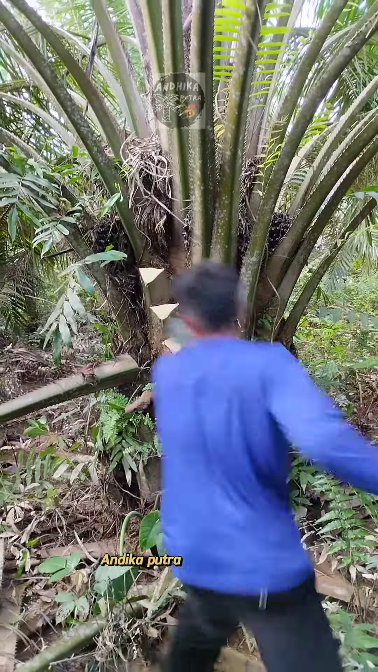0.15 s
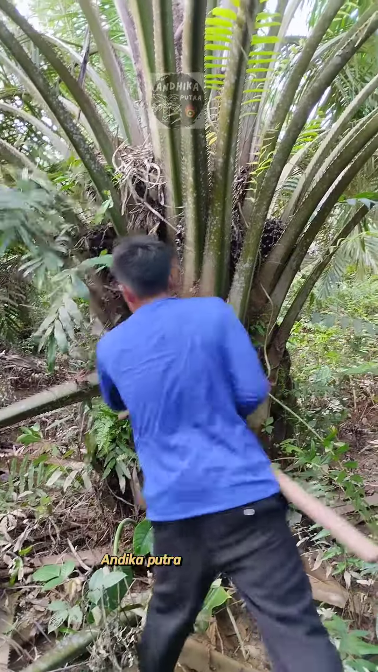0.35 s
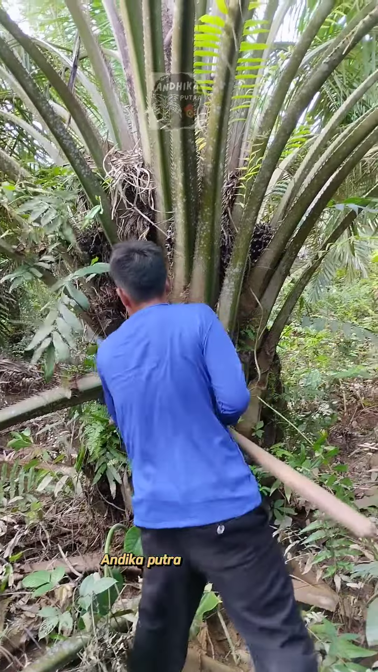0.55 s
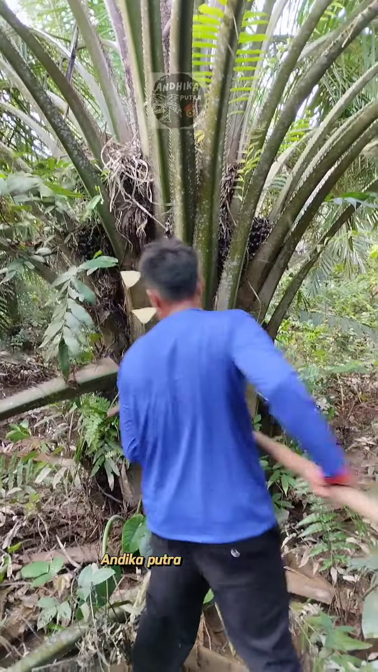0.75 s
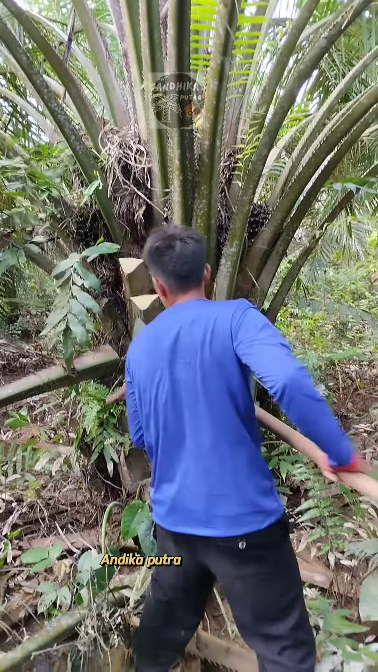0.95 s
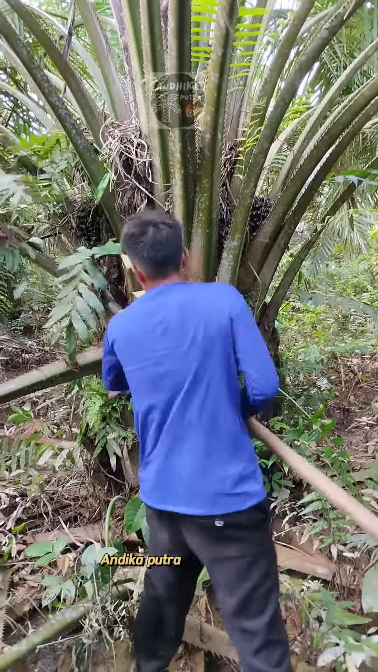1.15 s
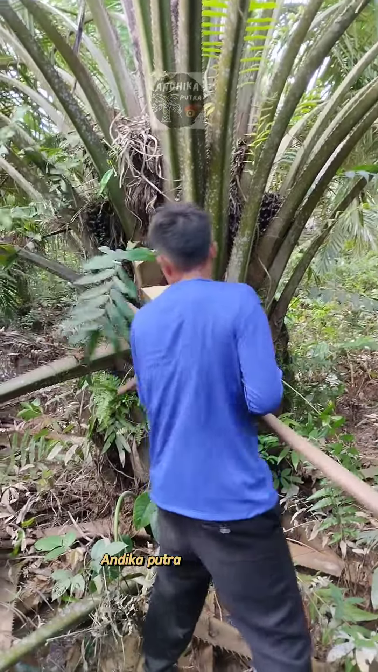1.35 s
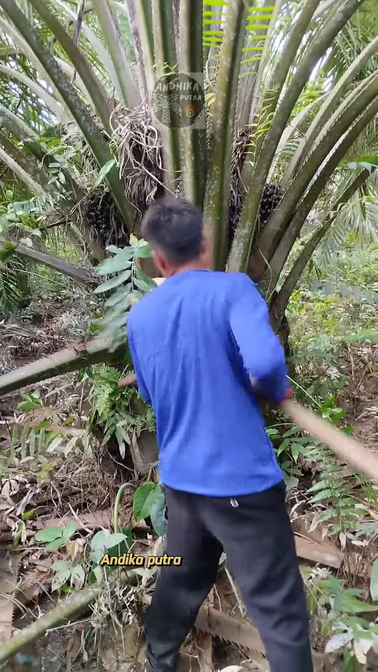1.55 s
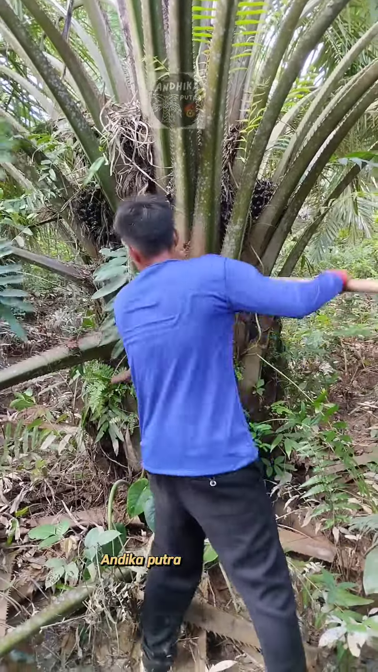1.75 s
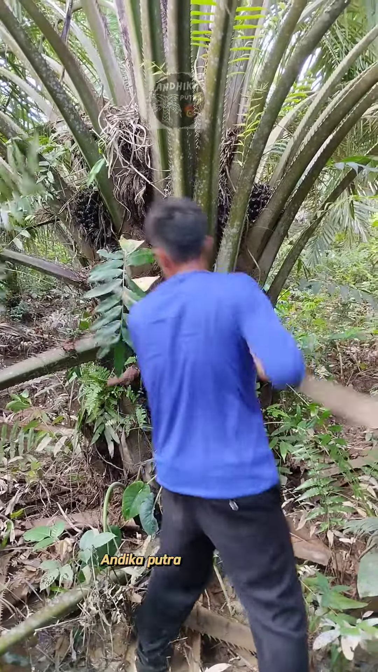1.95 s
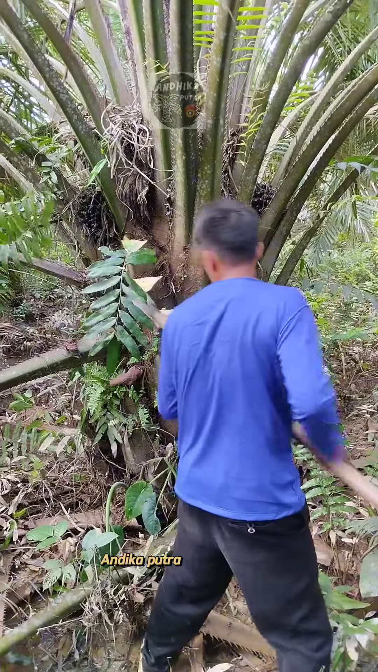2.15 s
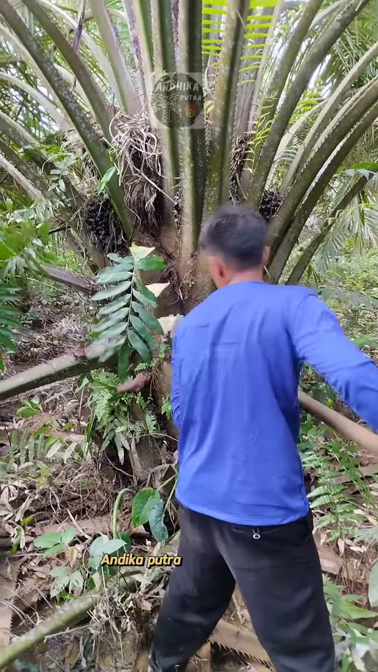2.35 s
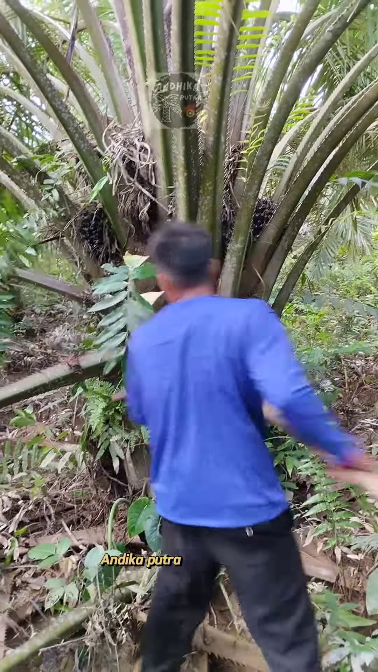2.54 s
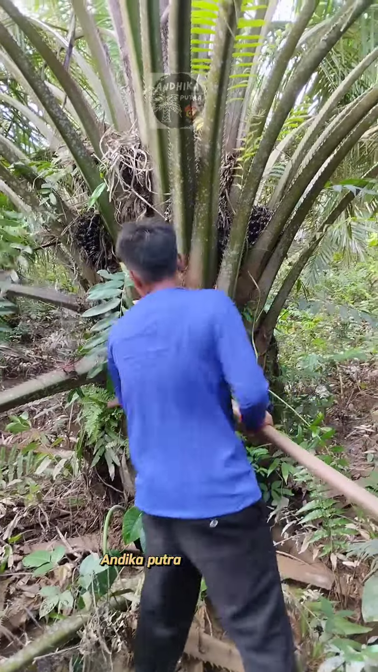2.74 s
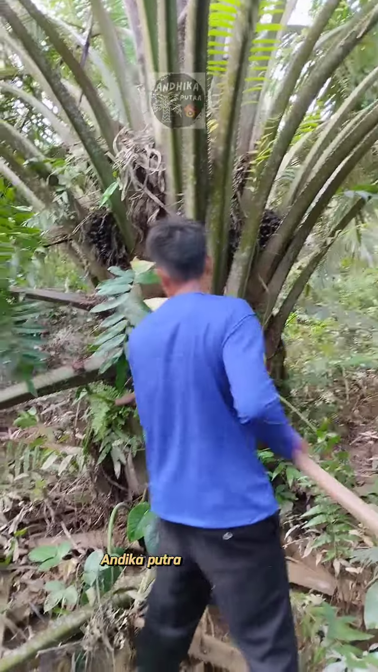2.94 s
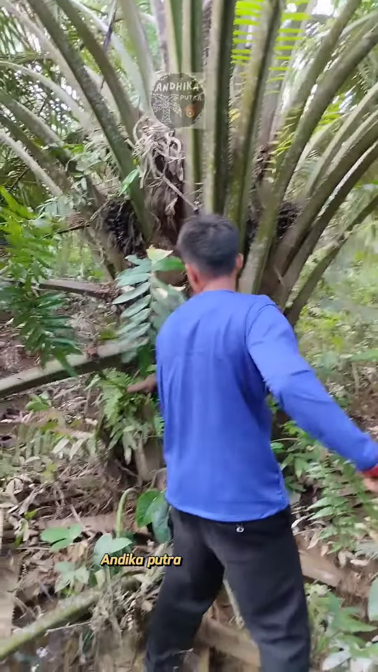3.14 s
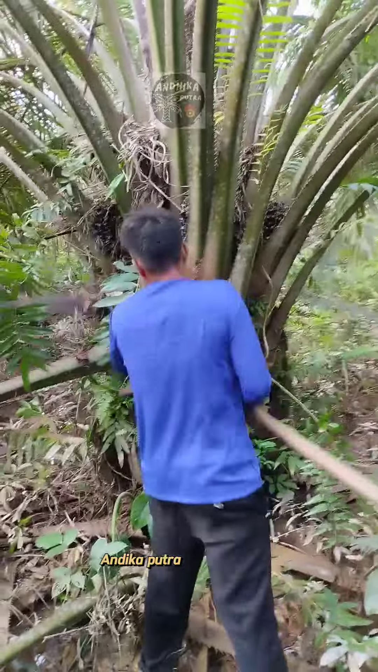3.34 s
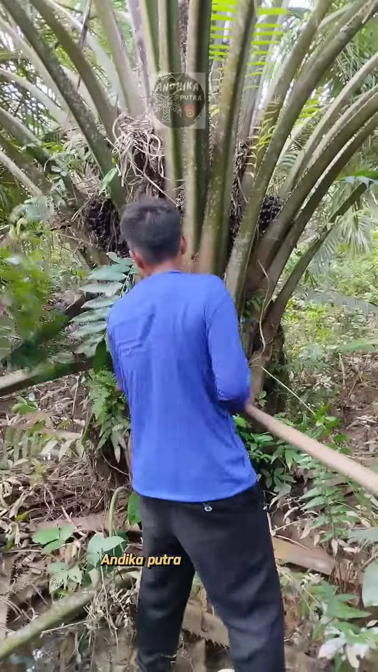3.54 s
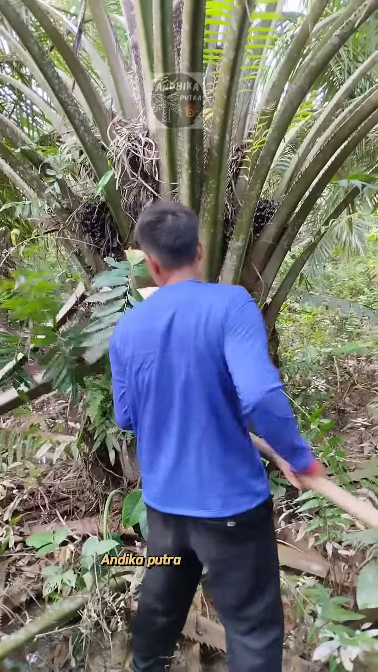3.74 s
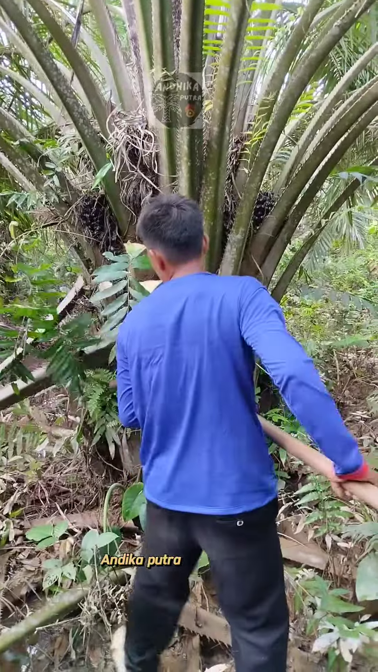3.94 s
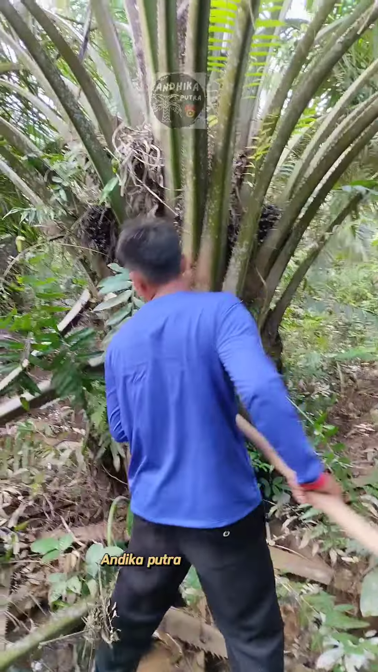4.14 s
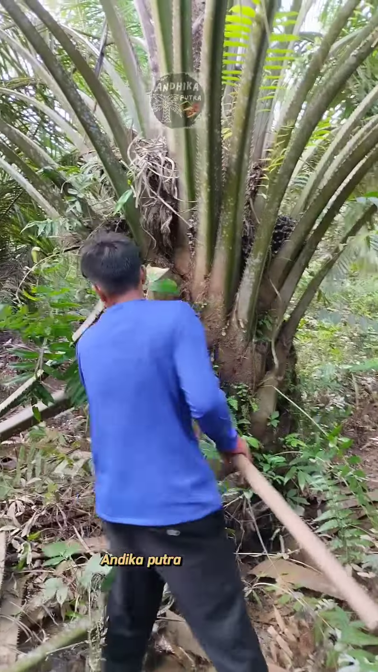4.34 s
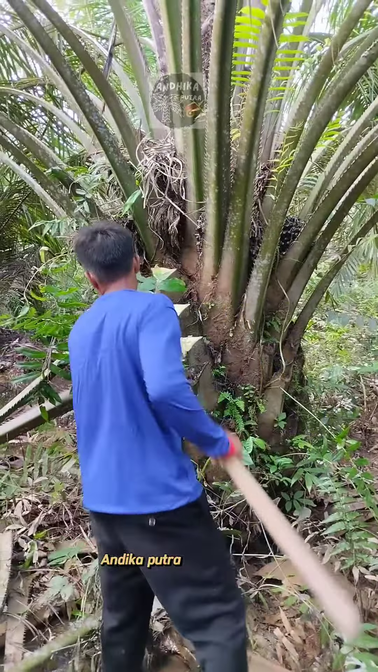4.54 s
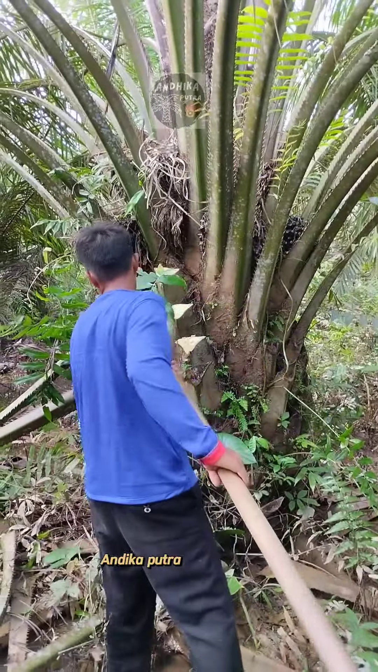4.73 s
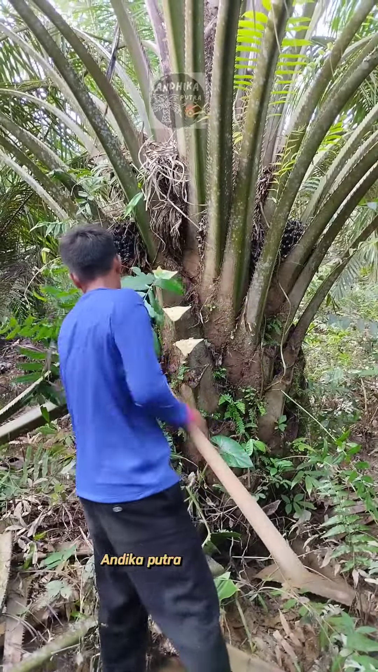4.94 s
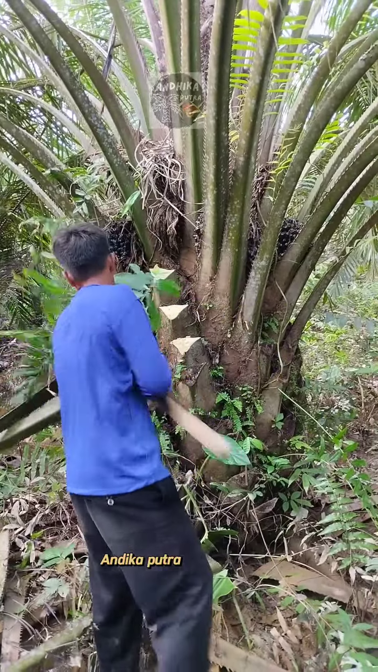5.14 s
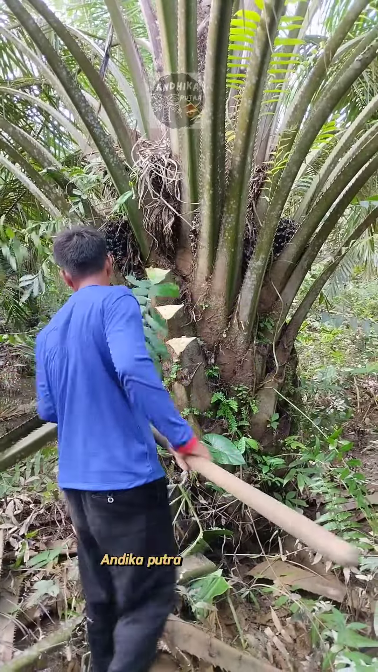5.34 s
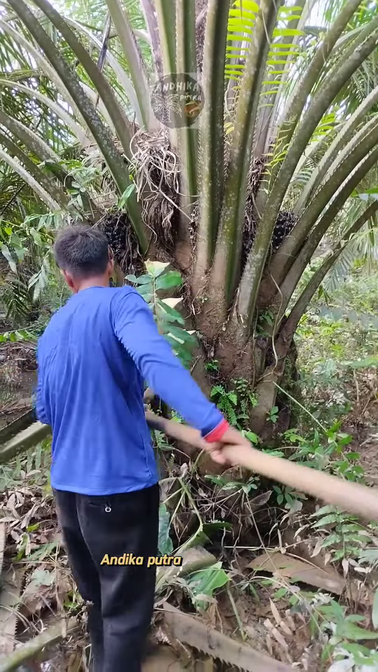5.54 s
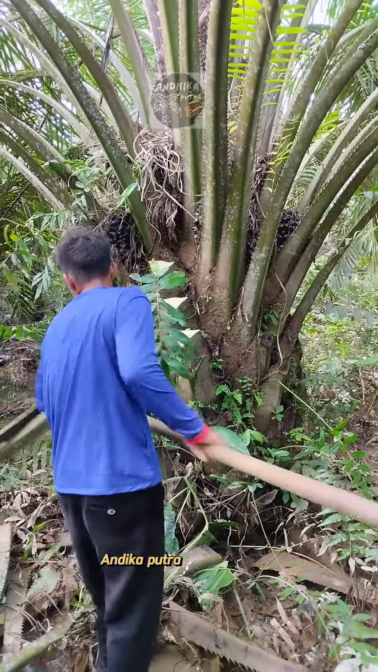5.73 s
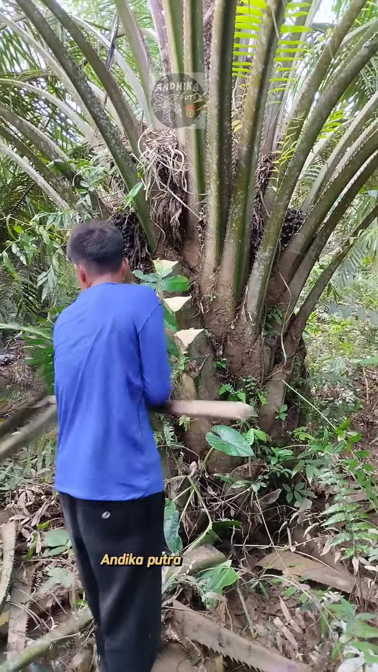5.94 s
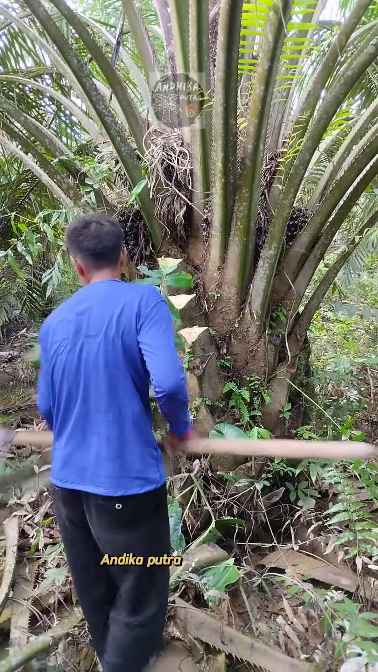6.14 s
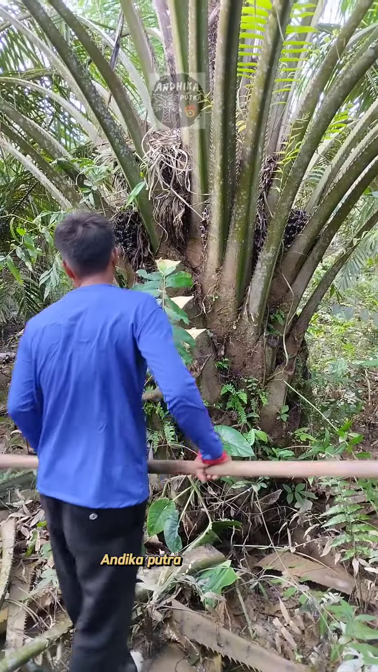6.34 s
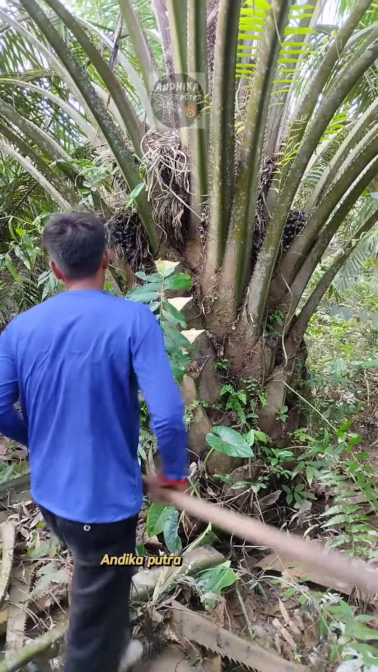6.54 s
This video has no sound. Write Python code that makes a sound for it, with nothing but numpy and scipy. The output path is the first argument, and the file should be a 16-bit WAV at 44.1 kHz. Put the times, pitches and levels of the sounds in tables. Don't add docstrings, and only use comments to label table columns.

```python
import sys
import numpy as np
from scipy import signal
from scipy.fft import rfft, irfft
from scipy.io import wavfile
from scipy.ndimage import uniform_filter1d

SR = 44100
rng = np.random.default_rng(int(sys.argv[2]) if len(sys.argv) > 2 else 0)


def master_out(mix):
    frames = np.transpose(np.atleast_2d(mix))
    ceiling = np.clip(frames, -1, 1)
    pcm = np.round(ceiling * 32767).astype(np.int16)
    wavfile.write(sys.argv[1], SR, pcm)


def field_ratio(decibels):
    return 10 ** (np.asarray(decibels, dtype=float) / 20)


N = 290235


def evened(x):
    return x / np.sqrt(np.mean(x ** 2) + 1e-20)


def smoothed_twice(x, size, axis=-1):
    return uniform_filter1d(uniform_filter1d(x, size=size, axis=axis), size=size, axis=axis)


def read(points, hz):
    f, value = np.transpose(points)
    return np.interp(np.log(hz + 1), np.log(f + 1), value)


def curves(rows):
    s, *columns = np.transpose(rows)
    return [np.interp(np.arange(N) / SR, s, c) for c in columns]


def add(mix, s, sound):
    part = mix[round(s * SR):][:len(sound)]
    part += sound[:len(part)]


def resonate(x, hz, width):
    return signal.lfilter(*signal.iirpeak(hz, hz / width, SR), x)


def resonate_twice(x, hz, width):
    return resonate(resonate(x, hz, width), hz, width)


def band(x, lo_hz, hi_hz):
    sos = signal.butter(2, [lo_hz, min(hi_hz, .45 * SR)], "bandpass", fs=SR, output="sos")
    return signal.sosfilt(sos, x)


def coloured(x, spectrum):
    gain = field_ratio(read(spectrum, np.fft.rfftfreq(len(x), 1 / SR)))
    return evened(irfft(rfft(x) * gain, len(x)))


def crackle(size, spread_db, share):
    noise, chance, strength = rng.standard_normal(size), rng.random(size), rng.exponential(1, size)
    breaks = (chance < share) * field_ratio(spread_db * np.minimum(strength, 3))
    bursts = signal.lfilter([1], [1, -.97], breaks)
    return evened(noise * (1 + bursts))


def patchy(spectrum, patch_db):
    hz = np.fft.rfftfreq(1024, 1 / SR)
    real, imag, patches = rng.standard_normal((N // 256 + 5, 513, 3)).T
    patches = evened(smoothed_twice(smoothed_each_way(patches), 1))
    level_db = read(spectrum, hz)[:, None] + patch_db * patches
    noise = signal.istft((real + 1j * imag) * field_ratio(level_db), nperseg=1024, noverlap=768)[1]
    return evened(noise[:N])


def smoothed_each_way(patches):
    return uniform_filter1d(uniform_filter1d(patches, size=12, axis=0), size=12, axis=1)


# frequency in Hz, level in dB per Hz.
AIR_SPECTRUM = [(12, -44), (20, -10.5), (117, 3), (236, -14), (381, -26), (1170, -29), (1550, -29),
                (1990, -32.5), (2640, -31), (3910, -84), (8110, -59), (9870, -70.5), (16400, -63.5)]
AIR_DB = -37
GUST_DB, GUST_SWING_DB = -47, 4.0


def air():
    still = field_ratio(AIR_DB - 3) * patchy(AIR_SPECTRUM, 0.4)
    gusts = evened(smoothed_twice(rng.standard_normal(N), 2500))
    breeze = evened(band(rng.standard_normal(N), 40, 200))
    return still + field_ratio(GUST_DB + GUST_SWING_DB * gusts) * breeze


# frequency in Hz, width in Hz, level in dB.
ENGINE_ORDERS = [(119, 14, -47), (220.6, 48, -53), (51.7, 11, -84.5)]
# frequency in Hz, width in Hz, level in dB.
INSECT_BAND = (9850, 1100, -67.5)


def engine_and_insects():
    out = np.zeros(N)
    for hz, width, db in [*ENGINE_ORDERS, INSECT_BAND]:
        out += field_ratio(db) * evened(resonate_twice(rng.standard_normal(N), hz, width))
    return out


# frequency in Hz, level in dB per Hz.
LEAF_SPECTRUM = [(180, -34.5), (300, 1), (681, 0), (890, -0.5), (1450, 0.5), (2970, -0.5), (4150, 0.5),
                 (9100, -11.5), (15000, -13), (16400, -12.5)]
# frequency in Hz, level in dB per Hz.
LITTER_SPECTRUM = [(180, -40), (300, -6.5), (567, -4), (875, -14.5), (1260, -8), (1800, -12.5),
                   (2090, -1.5), (3120, -12.5), (4430, -4), (5510, -17), (8800, -11.5), (10100, -17.5),
                   (15000, -20), (16400, -17)]
DOWN_S = 4.9
# time in seconds, level in dB.
RUSTLE_LEVELS = [(0.0, -54.5), (.2, -59), (.33, -37), (.45, -41), (.71, -41.5), (.9, -48), (1.74, -47),
                 (2.35, -59.5), (2.6, -56), (2.78, -45), (3.48, -74), (4.31, -64.5), (4.89, -68.5),
                 (5.31, -41), (5.55, -61.5), (5.8, -55.5), (6.21, -41.5), (6.58, -58.5)]
FIZZ_DB, FIZZ_LOSS_PER_DB, DRY_FIZZ_DB = -18.5, 1.03, -6


def rustle():
    level_db, = curves(RUSTLE_LEVELS)
    grains = crackle(N, 2.5, 0.0015)
    down = np.clip((np.arange(N) / SR - DOWN_S) * 10, 0, 1)
    body = (1 - down) * coloured(grains, LEAF_SPECTRUM) + down * coloured(grains, LITTER_SPECTRUM)
    body = body + field_ratio(-12 + 5 * down) * ticks(260, 1200, 9000, 4.)
    fizz_db = FIZZ_DB - FIZZ_LOSS_PER_DB * (level_db + 56.0) + DRY_FIZZ_DB * down
    fizz = evened(band(crackle(N, 2., .002), 6000, 14000))
    return field_ratio(level_db - 1) * (body + field_ratio(fizz_db) * fizz)


def ticks(per_s, lo_hz, hi_hz, spread_db):
    t, out = np.arange(300) / SR, np.zeros(N)
    for hz in np.geomspace(lo_hz, hi_hz, num=12):
        at, strength = rng.random(N) < per_s / 12 / SR, rng.exponential(1, N)
        hits = at * field_ratio(spread_db * np.minimum(strength, 3))
        tick = np.sin(2 * np.pi * hz * t) * t * hz * np.exp(-t * hz / 0.67)
        out += signal.oaconvolve(hits, tick)[:N]
    return evened(out)


# start in seconds, peak in dB, ring in Hz.
TIP_FLICKS = [(0.055, -48, 13000), (.126, -52, 12240), (0.207, -31, 4070), (1.661, -35.5, 5130),
              (1.956, -46, 14000), (2.296, -48.5, 13000), (2.369, -50, 12000), (2.55, -48, 14000),
              (2.806, -38, 13000), (2.965, -50.5, 9000), (2.83, -31.5, 9380), (3.366, -41.5, 13000),
              (4.318, -37.5, 8700), (4.335, -45, 11000), (4.535, -50, 8900), (5.155, -36.5, 8200),
              (5.929, -35, 8500), (6.024, -36.5, 8600), (6.075, -35, 8500), (6.316, -36.5, 7870),
              (6.544, -64, 8200)]
# start in seconds, peak in dB, ring in Hz, splinter hiss in dB.
LEAFLET_SNAPS = [(.0568, -39, 937, -11), (0.124, -40, 2630, -4), (.1472, -25.5, 4720, -13.5),
                 (0.478, -32, 3670, -8), (.712, -31.5, 1400, -5), (.827, -26.5, 1720, -14),
                 (0.864, -32, 1110, -14), (.866, -29, 1700, -8.5), (0.869, -30, 3450, -12),
                 (0.9447, -42, 1310, -8), (1.0558, -33, 1580, -12.5), (1.283, -14, 3100, -15),
                 (1.422, -24, 3100, -17), (1.4788, -11, 3030, -17.5), (1.5152, -18.5, 2980, -9),
                 (1.6384, -31, 2920, -35), (1.6733, -20, 2940, -11), (1.688, -37.5, 1530, 7.5),
                 (1.708, -20, 3060, -15), (1.7444, -28, 3900, -8), (1.765, -38, 5540, 1),
                 (1.921, -38, 1230, -17), (1.9576, -40, 1820, -14), (2.3027, -57, 960, 2.5),
                 (2.559, -44.5, 2640, -4), (3.018, -40, 3180, -10.5)]
# start in seconds, peak in dB, ring in Hz, splinter hiss in dB.
RIB_CREAKS = [(.129, -47, 950, -20), (0.22, -20, 1770, -11), (.226, -23, 1600, -6), (0.248, -21, 2010, -10),
              (0.24, -23.5, 1184, -22), (0.272, -17, 1876, -25), (0.23, -24, 2300, -19),
              (1.801, -22, 1100, -7), (3.368, -16.5, 2210, -30), (4.526, -28.5, 2000, -26),
              (4.968, -16, 1290, -14), (5.309, -12.5, 2080, -19.5), (5.457, -29, 2140, -17),
              (5.748, -17, 2060, -21), (6.54, -36, 2000, -4), (5.7425, -20, 1150, -8),
              (4.972, -21.5, 960, -35), (6.54, -36.5, 870, -17), (4.535, -30, 2600, -20)]
# start in seconds, peak in dB, ring in Hz.
DRY_CRACKS = [(5.032, -36, 2240), (5.0729, -17.5, 3200), (5.0788, -25, 2400), (5.1146, -23.5, 2340),
              (5.14, -24, 5250), (5.1756, -26, 2480), (5.185, -21.5, 3600), (5.231, -24, 2110),
              (5.2515, -18.5, 2380), (5.2802, -18, 4600), (5.341, -12, 2400), (5.484, -28, 3880),
              (5.0718, -32, 4700), (5.082, -22, 3040), (5.2356, -20, 2790), (5.4538, -20.5, 2650),
              (5.478, -31, 2300), (5.5466, -44, 2510), (5.635, -50, 1980), (5.653, -54, 3750),
              (5.93, -35, 4200), (6.514, -43, 2500), (5.1502, -27, 2430), (5.859, -23, 2500),
              (5.8788, -18, 2580), (5.9404, -23.5, 4440), (5.9914, -36, 4700), (6.0548, -24.5, 2660),
              (6.0765, -19, 5030), (6.1028, -16, 4530), (6.1264, -15.5, 2630), (6.144, -20, 2720),
              (6.1807, -23, 2850), (6.192, -18, 2400), (6.21, -15.5, 2550), (6.237, -15.5, 3780),
              (6.257, -16.5, 2560), (6.298, -29, 1748), (6.368, -25.5, 2720), (6.44, -36, 1760)]
TIP_T60_S, SNAP_T60_S, CREAK_T60_S, CRACK_T60_S = 0.071, 0.055, 0.049, 0.059
TIP_HISS_DB = -1.5
CRACK_HISS_DB, HISS_LOSS_PER_DB = -11, .5


def ribs():
    thin, thick, brittle = 26, 48, 17
    middling_db = -25
    out = np.zeros(N)

    def play(s, *rib):
        add(out, s, snap(LEAF_SPECTRUM if s < DOWN_S else LITTER_SPECTRUM, *rib))

    for s, db, hz, hiss_db in LEAFLET_SNAPS:
        play(s, thin, db, hz, hiss_db, SNAP_T60_S)
    for s, db, hz, hiss_db in RIB_CREAKS:
        play(s, thick, db, hz, hiss_db, CREAK_T60_S)
    for s, db, hz in TIP_FLICKS:
        play(s, thin, db, hz, TIP_HISS_DB, TIP_T60_S)
    for s, db, hz in DRY_CRACKS:
        hiss_db = CRACK_HISS_DB - HISS_LOSS_PER_DB * (db - middling_db)
        play(s, brittle, db, hz, hiss_db, CRACK_T60_S)
    return out


def snap(spectrum, cycles, db, hz, hiss_db, t60):
    t = np.arange(SR // 6) / SR
    turns = t * hz / cycles
    ring = np.sin(2 * np.pi * hz * t) * np.minimum(turns * 14, 1) * field_ratio(-60 * turns)
    grains = crackle(len(t), 1., .004)
    wide = coloured(band(grains, hz / 3, 23000), spectrum)
    crack = field_ratio(-24.5 - 60 * t / 0.0031) * wide
    splinters = wide + field_ratio(-4.5) * evened(resonate(grains, hz, hz / 4))
    fade = field_ratio(hiss_db - 2 - 60 * (t / t60) ** 1.3) * np.minimum(t / 0.003, 1)
    return field_ratio(db) * (ring + crack + fade * splinters)


# start in seconds, peak in dB, rise in seconds,
# t60 in seconds, centre in Hz.
STALK_BUMPS = [(3.906, -32, 0.0019, 0.052, 910), (.175, -38.5, 0.015, 0.94, 1830),
               (1.675, -25.5, 0.01, 0.083, 2700), (1.893, -37, 0.025, 0.078, 1300),
               (2.668, -7.5, 0.0092, 0.027, 1930), (2.825, -41, 0.0044, 0.067, 5320),
               (3.172, -46.5, 0.018, 0.085, 1210), (3.363, -25.5, 0.0033, 0.22, 1370),
               (4.311, -23, 0.0039, 0.14, 1250), (4.326, -34, 0.013, 0.064, 2380),
               (4.525, -49.5, 0.0036, 0.64, 2170), (4.964, -30.5, 0.011, 0.094, 2320)]
# start in seconds, peak in dB, rise in seconds, t60 in seconds, centre in Hz.
BLADE_CHOPS = [(.207, -33.5, 0.016, 0.33, 3850), (1.8, -24, 0.0022, 0.065, 2760),
               (3.514, -27, 0.0022, 0.042, 1310), (.282, -12, 0.0073, 0.12, 3100),
               (1.135, -9, 0.025, 0.09, 3100), (1.345, -37, .022, .1, 4000), (1.503, -38, .015, .15, 6000),
               (2.653, -15.5, 0.0048, 0.17, 2940), (2.904, -32.5, 0.0018, 0.091, 2000),
               (3.203, -36.5, 0.00089, 0.038, 1520), (3.938, -47.5, 0.0038, 0.1, 2540),
               (5.44, -31, 0.01, 0.22, 2310), (5.7405, -20, 0.0038, 0.057, 1870),
               (5.754, -30, .004, 0.049, 3770), (5.765, -32, .003, 0.083, 2460),
               (.552, -40.5, 0.011, .1, 1900), (.637, -38.5, 0.012, .08, 3550), (.69, -40, .01, .08, 2672),
               (4.235, -51.5, 0.017, .15, 2560), (5.77, -38, 0.059, 0.5, 3000),
               (6.049, -37, 0.07, 0.76, 3970), (6.171, -30.5, 0.064, 0.18, 3800)]
# start
# in seconds, peak in dB, rise in seconds, t60 in seconds, centre in Hz.
THUMPS = [
    (3.51, -39.5, 0.018, .03, 1000),
    (2.677, -32, 0.0058, 0.035, 890),
    (4.973, -41, 0.0058, 0.044, 670),
]
BUMP_STALK_DB, CHOP_STALK_DB, THUMP_STALK_DB = 3.5, -15, 24
# frequency in Hz, level in dB per Hz.
FIBRE_SPECTRUM = [(150, -52), (330, -11.5), (512, -8.5), (961, -7), (1270, -4), (1680, -8), (3390, -7.5),
                  (10000, -7.5), (14700, -22), (16400, -26)]


def blows():
    out = np.zeros(N)
    for table, stalk_db in ((BLADE_CHOPS, CHOP_STALK_DB), (STALK_BUMPS, BUMP_STALK_DB),
                            (THUMPS, THUMP_STALK_DB)):
        for s, *row in table:
            add(out, s, chop(FIBRE_SPECTRUM if s < DOWN_S else LITTER_SPECTRUM, *row, stalk_db))
    return out


# frequency in Hz, width in Hz, level in dB.
STEEL_RINGS = [(1290, 45, -8), (3010, 40, -8), (3320, 40, -12), (5120, 45, -14)]
# frequency in Hz, width in Hz.
STALK_RING = (495, 167)


def chop(spectrum, db, rise, t60, hz, stalk_db):
    t = np.arange(SR // 2) / SR
    fibres = crackle(len(t), .5, .004)
    wide = coloured(fibres, spectrum)
    dull = band(wide, 96, hz * 1.47) + field_ratio(-19.0) * wide
    spray = field_ratio(-17) * evened(band(fibres, 9700, 22000))
    tear = evened(dull) + spray + field_ratio(1.5) * evened(resonate(fibres, hz, hz / 2))
    rings = sum(field_ratio(d) * evened(resonate(fibres, f, w)) for f, w, d in STEEL_RINGS)
    steel = field_ratio(min(2.6 * (db + 8.5), 0)) * rings
    stalk = field_ratio(stalk_db) * evened(resonate_twice(fibres, *STALK_RING))
    swell = np.clip(t / max(rise, .001), 0, 1)
    fade = field_ratio(-60 * np.maximum(t - rise, 0) / t60)
    return field_ratio(db - 8.0) * fade * ((tear + steel) * swell ** 1.05 + stalk * swell ** 4)


# frequency in Hz, t60 in seconds.
GROVE_DECAY = [(250, 0.13), (1000, 0.13), (4000, 0.21), (12000, 0.35)]


def grove(x):
    taps = np.zeros(SR // 2)
    at = np.arange(300, len(taps) - 20, 20)
    taps[at + rng.integers(0, 20, len(at))] = rng.choice([-1., 1.], len(at))
    hz, t, z = signal.stft(taps, SR, nperseg=256)
    tail = signal.istft(z * field_ratio(-60 * t / read(GROVE_DECAY, hz)[:, None]), SR, nperseg=256)[1]
    return signal.fftconvolve(x, tail / np.linalg.norm(tail))[:N]


# time in seconds, pitch in Hz, level in dB.
BIRD_CALL = [
    (2.0, 1900, -62),
    (2.03, 2050, -62),
    (2.05, 2370, -60),
    (2.09, 2480, -54),
    (2.115, 2640, -53),
    (2.15, 2660, -62),
    (2.2, 2700, -55),
    (2.26, 2700, -62),
    (2.33, 2640, -68),
]
WOBBLE_HZ = 90


def bird():
    hz, db = curves(BIRD_CALL)
    t = np.arange(N) / SR
    waver = 1 + .45 * evened(uniform_filter1d(rng.standard_normal(N), size=500))
    whistle = np.sin(2 * np.pi * np.cumsum(hz + WOBBLE_HZ * (waver - 1)) / SR)
    calling = (t > BIRD_CALL[0][0]) * (t < BIRD_CALL[-1][0])
    return field_ratio(db) * waver * whistle * calling


# time in seconds, rumble in dB.
GRIP_RUMBLE = [
    (3.1, -46),
    (3.22, -26),
    (3.33, -35),
    (3.46, -18),
    (3.56, -34),
    (3.67, -19.5),
    (3.82, -32),
    (4.49, -38),
    (5.0, -50),
]
# start in seconds, level in dB, ring in Hz, tick in dB.
FINGER_PRESSES = [(3.1536, -8, 111, -19), (3.199, -12, 30, -38), (3.204, -4.5, 310, -3),
                  (3.207, -16, 150, -30), (3.2295, -28.5, 150, 6), (3.4052, -11, 150, -30),
                  (3.407, 1, 270, -11), (3.4098, -20, 120, -33), (3.419, -14, 100, -33),
                  (3.4235, -1.5, 85, -40), (3.4665, -9, 120, -34), (3.484, -5, 130, -33),
                  (3.4985, -20.5, 220, -35), (3.5075, -7, 150, -19), (3.511, -8, 200, -28),
                  (3.519, -11.5, 90, -16), (3.522, -8.5, 170, -27), (3.525, -5.5, 190, -31),
                  (3.5298, -11, 130, -24), (3.533, 10.5, 140, -27), (3.5393, 0.5, 202, -26),
                  (3.5418, 10, 126, -10), (3.6085, -13, 70, -23), (3.6302, -8, 200, -40),
                  (3.636, -8.5, 70, -20), (3.649, -2.5, 62, -45.5), (3.6625, -10, 120, -38.5),
                  (3.6672, 3.5, 170, -38), (3.675, 1, 70, -43), (3.725, -16.5, 110, -12.5),
                  (3.864, -5, 40, -43), (3.881, -1, 38, -35), (3.8965, -1, 45, -35), (3.9085, -1, 85, -16),
                  (4.3135, -15, 234, -34), (4.7, -11.5, 159, -13.5), (4.772, -18.5, 96, -14),
                  (4.866, -25.5, 223, -8.5), (5.379, -19.5, 105.4, -27)]
# start in seconds, level in dB, ring in Hz, tick in dB.
FINGER_RELEASES = [(3.1525, -4.5, 403, -48), (3.176, -22, 90, -12), (3.2115, -14, 170, -30),
                   (3.4, -22, 300, -38), (3.4035, -14, 250, -30), (3.412, -1, 70, -9),
                   (3.4145, -4, 260, -30), (3.479, -11, 70, -40), (3.513, -12, 76, -30),
                   (3.5165, -7.5, 150, -1), (3.545, 6, 72, -35), (3.527, -6, 150, -37),
                   (3.6702, -4.5, 139, -24), (3.586, -25.5, 38.2, -43.5), (3.6325, -7, 200, -28),
                   (3.6425, 1, 70, -45), (3.6915, 3, 49.7, -45), (3.708, -6.5, 65, -45),
                   (3.748, -15, 90, -41), (3.855, -12, 50, -50), (3.8595, 1.2, 85, -52),
                   (3.892, -10, 90, -45), (3.974, -19, 55, -50), (3.979, -9, 120, -50),
                   (3.993, -17, 55, -50), (3.998, -13, 110, -50), (4.2262, -9, 130, -38),
                   (4.239, -15.5, 80, -44), (5.438, -16.5, 101, -39), (5.744, -13, 300, -20)]
# start in seconds, level in dB, swing in Hz, t60 in seconds,
# push 1 or pull -1.
HAND_LURCHES = [
    (3.209, -4, 47, 0.033, -1),
    (3.704, -1.5, 17, 0.068, -1),
    (3.717, -6, 10.1, .7, 1),
    (3.8734, 1, 48, 0.042, -1),
]
LURCH_TICK_DB = -41
CASING_T60_S, CASING_LAW = 0.027, 1
CASING_HZ = 1600
SCRAPE_DB, SCRAPE_PER_DB = -64, 0.5


def handling():
    rumble_db, = curves(GRIP_RUMBLE)
    scrape_db = SCRAPE_DB + SCRAPE_PER_DB * (rumble_db + 33)
    out = field_ratio(rumble_db) * evened(band(rng.standard_normal(N), 24.4, 96.0))
    out += field_ratio(scrape_db) * evened(band(crackle(N, 3., .002), 200, 900))
    out *= (np.arange(N) > GRIP_RUMBLE[0][0] * SR) & (np.arange(N) < GRIP_RUMBLE[-1][0] * SR)
    for table, push in ((FINGER_PRESSES, 1), (FINGER_RELEASES, -1)):
        for s, db, hz, tick_db in table:
            t60 = CASING_T60_S * (100 / hz) ** CASING_LAW
            add(out, s, knock(db, hz, t60, push, tick_db))
    for s, *row in HAND_LURCHES:
        add(out, s, knock(*row, LURCH_TICK_DB))
    return signal.lfilter(*signal.butter(2, CASING_HZ, fs=SR), out)


def knock(db, hz, t60, push, tick_db):
    t = np.arange(SR // 2) / SR
    onset = (1 - np.exp(-t * hz * 13)) ** 3
    swing = np.sin(2 * np.pi * hz * t) * onset * field_ratio(-60 * t / t60 + 3.5)
    u = np.maximum(t - min(0.255 / hz, .003), 0) / 0.0001
    tick = u ** 3 * np.exp(-u) * (1 - u / 4)
    return np.sign(push) * field_ratio(db) * (swing + field_ratio(tick_db) * tick)


def ducked(x, thuds):
    power_db = 10 * np.log10(abs(uniform_filter1d(thuds ** 2, size=900)) + 1e-12)
    fall = np.arange(N) * 35.0 / SR
    held_db = np.maximum.accumulate(power_db + fall) - fall
    over_db = np.maximum(held_db + 36.0, 0)
    return x / field_ratio(.5 * uniform_filter1d(over_db, size=300))


def scene():
    work = blows() + ribs()
    work = .7 * np.tanh(work / .7)
    thuds = handling()
    background = air() + engine_and_insects() + bird()
    return (work + field_ratio(-9.5) * grove(work) + rustle() + ducked(background, thuds) + thuds)[None]


def low_pass(x):
    return signal.sosfilt(signal.butter(12, 16500, fs=SR, output="sos"), x)


def record(dry):
    image = field_ratio(-57) * np.cos(2 * np.pi * np.arange(N) / 5)
    overloaded = np.clip(dry * (1 + image), -.98, .98)
    edge = signal.firwin(1201, 15850, window=("kaiser", 7), fs=SR)[None]
    return low_pass(signal.oaconvolve(overloaded, edge, "same"))


dry = scene()
out = record(dry)
master_out(out)
```